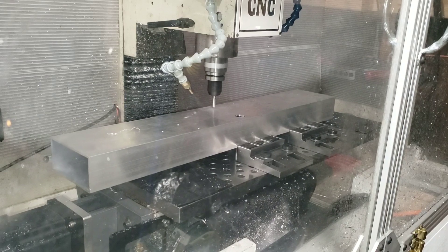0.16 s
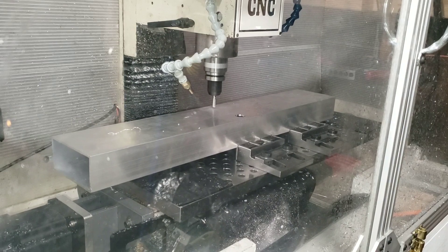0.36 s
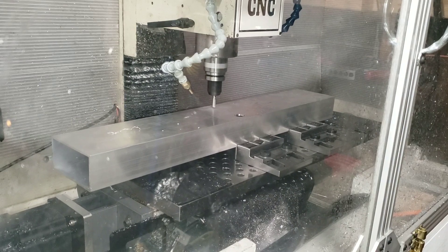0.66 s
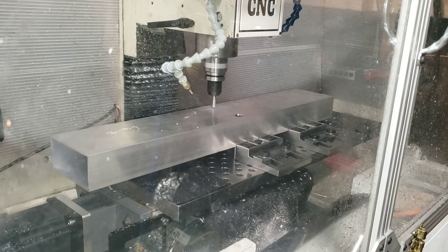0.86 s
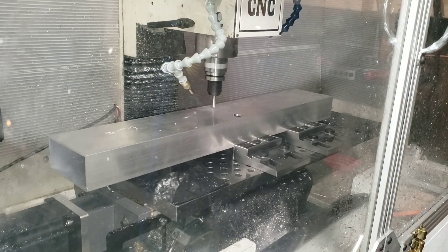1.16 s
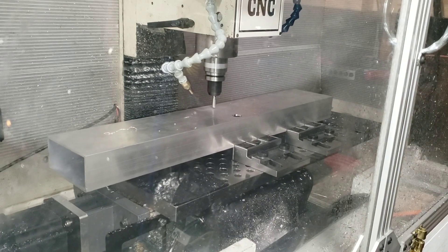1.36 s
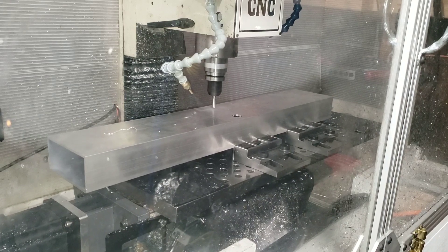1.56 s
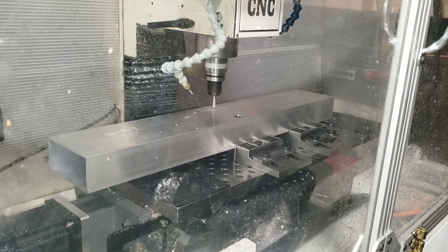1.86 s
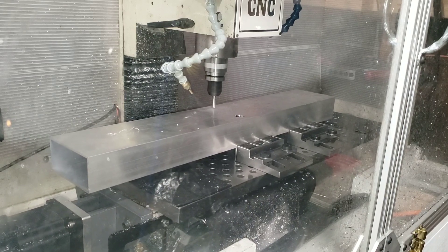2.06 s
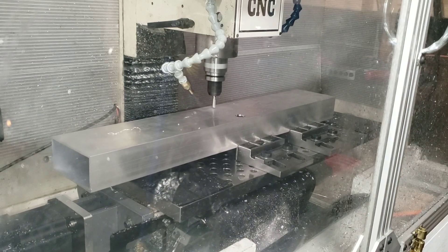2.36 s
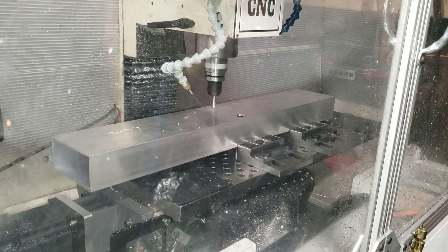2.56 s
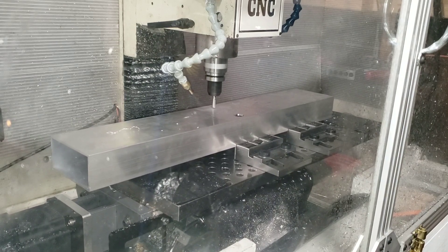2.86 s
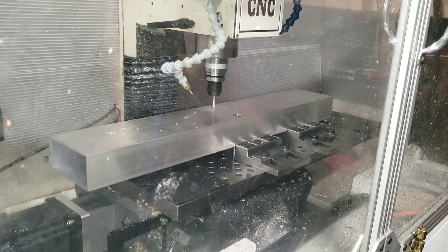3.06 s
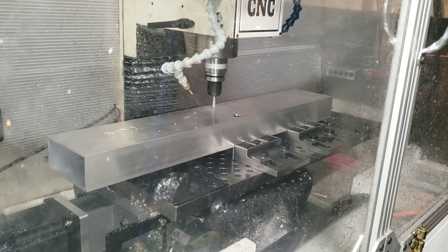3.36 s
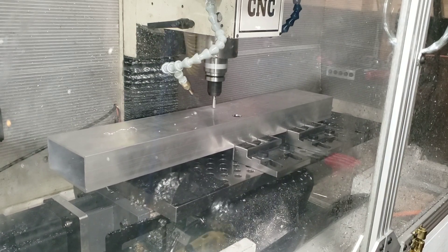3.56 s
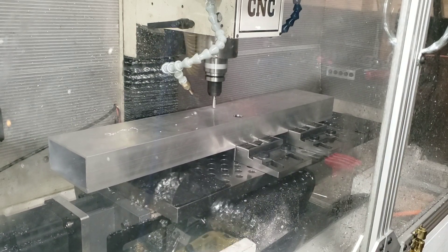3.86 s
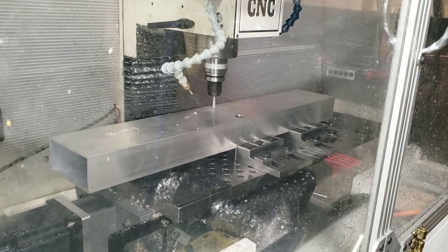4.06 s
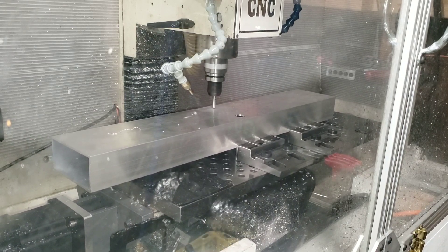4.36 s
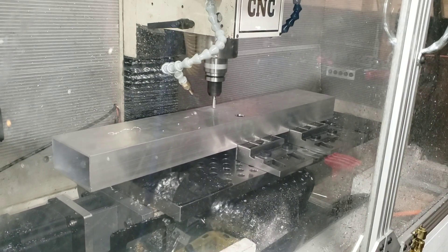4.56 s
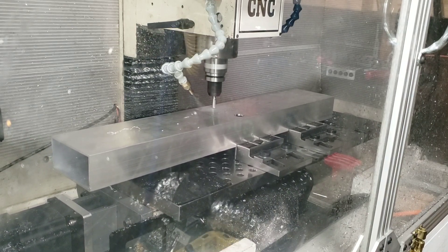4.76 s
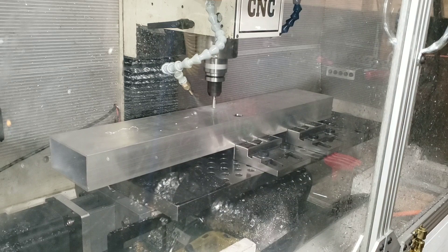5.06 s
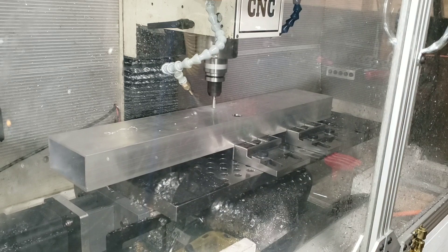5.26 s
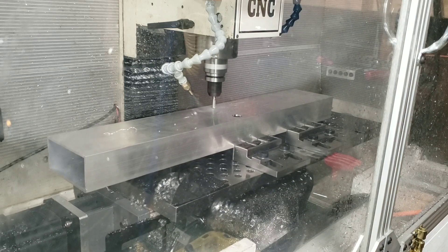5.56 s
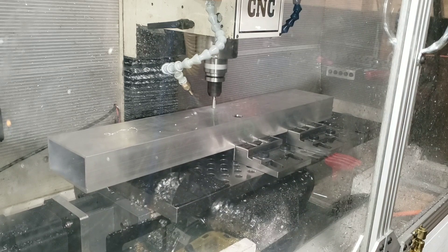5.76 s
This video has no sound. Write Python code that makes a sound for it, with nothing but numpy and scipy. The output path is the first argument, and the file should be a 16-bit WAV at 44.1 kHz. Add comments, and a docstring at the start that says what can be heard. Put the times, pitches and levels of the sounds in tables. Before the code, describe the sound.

A continuous close-up machining sound: broad, sizzling air-and-mist spray over low motor rumble and a steady hum. Table drive tones glide up and down beneath it, repeating with each two-second lap, without sharp cuts or impacts. Faint fan and spindle tones add a fine mechanical whine. The small metal enclosure gives a tight, hard ambience, heard in stereo with spread-out treble and a mostly central low end.

```python
"""Inside a sheet-metal enclosure a small mill cuts round a pocket in an aluminium tube, a lap in about two seconds.
A mist nozzle hisses as broad noise, built from bands of slightly varying level; motors and slides rumble lower.
The frame hums as a sine; spindle and fan sing as sines at multiples of shaft speed, among faint steady tones.
The feed drive's sine rises and falls through the frame resonances with the table speed. Two microphone ports
hear the bass alike and the hiss apart."""
import sys
import numpy as np
from scipy import signal
from scipy.fft import rfft, irfft
from scipy.io import wavfile
from scipy.ndimage import uniform_filter1d

SR = 44100
rng = np.random.default_rng(int(sys.argv[2]) if len(sys.argv) > 2 else 0)


def inscribe(sig):
    """Save sig as 16-bit PCM at rate SR to the path in sys.argv[1].

    A 1-D sig is mono; a 2-D sig holds one channel per row.
    Samples are clipped to [-1, 1] before scaling.
    """
    pcm = np.round(np.clip(np.atleast_2d(sig).T, -1, 1) * 32767)
    wavfile.write(sys.argv[1], SR, pcm.astype(np.int16))


N = 260631
T = np.arange(N) / SR  # time, s
F = np.fft.rfftfreq(N, 1 / SR)  # frequency of each bin, Hz
SIDES = np.array([[.5], [-.5]])  # left and right share of a difference between the ports
LAP_S = 2.032


def undb(db):
    """Amplitude ratio from decibels: twenty per factor of ten."""
    return 10 ** (np.asarray(db) / 20)


def curves(table):
    """Linear interpolation in time: each column of a time table as one value per sample."""
    s, *columns = np.transpose(table)
    return [np.interp(T, s, column) for column in columns]


def over_hz(table):
    """Interpolation on a logarithmic frequency axis: one value per bin."""
    hz, value = np.transpose(table)
    return np.interp(np.log(F + 1), np.log(hz), value)


def walk(rate):
    """Low-passed randomness: levels held 1 / rate s, smoothed by two moving averages; spread near 1."""
    hold = int(SR / rate)
    steps = np.repeat(rng.standard_normal(N // hold + 1), hold)
    return 1.52 * uniform_filter1d(uniform_filter1d(steps, hold), hold)[:N]


def wall_echoes(source):
    """Reverberation: a source spectrum reaches each port by its own exponentially decaying wall echoes."""
    t60_s = 0.16
    echoes = rng.standard_normal((2, N)) * undb(-60 * T / t60_s)
    return source * rfft(echoes) / np.sqrt(np.sum(echoes ** 2) / 2)


def noise(colour, vary_db, rate, echo_db, count=10):
    """Partly coherent noise in overlapping bands, each varying alone in level; the port average has rms 1."""
    # likeness of the two ports: (frequency [Hz], correlation [-1 to 1])
    likeness = [(25, .95), (60, .93), (110, .88), (220, .97), (300, .82), (550, .72), (640, .8), (760, .1),
                (850, -.2), (940, .5), (1200, -.05), (2000, .05), (7000, .05), (15000, -.2)]
    # balance of the ports: (frequency [Hz], left minus right [dB])
    balance = [(100, -2), (900, 1), (1000, 2.5), (1200, 0), (3500, 1.5), (5000, 0.8), (6800, 1.5),
               (8000, -2), (10000, -1), (12500, -3.5), (14300, -1.5), (15000, -3), (15700, -5)]
    # standing waves in the enclosure: (frequency [Hz], width [Hz], left boost [dB], right boost [dB])
    standing_waves = [(1700, 90, 2.1, 0.0), (1820, 90, 0.0, 2.5), (2756, 130, 1.8, 0.0),
                      (3531, 130, 0.0, 1.3), (11714, 130, 1.5, 0.0), (12489, 130, 0.0, 1.5),
                      (12919, 130, 0.0, 2.3), (13178, 130, 1.3, 0.0), (14211, 130, 0.0, 1.8),
                      (15417, 130, 0.0, 1.8)]
    alike = np.clip(over_hz(likeness), -1, 1)
    mid, side, source = rfft(rng.standard_normal((3, N)))
    pair = np.sqrt(1 + alike) * mid + 2 * SIDES * np.sqrt(1 - alike) * side
    pair = pair + undb(echo_db) * wall_echoes(source)
    waves_db = sum(np.array([[left_db], [right_db]]) / (1 + (2 * (F - hz) / width) ** 2)
                   for hz, width, left_db, right_db in standing_waves)
    pair = pair * undb(over_hz(colour) + SIDES * over_hz(balance) + waves_db)

    # raised-cosine bands, evenly spaced in log frequency across the colour table
    low, high = np.log(colour[0][0]), np.log(colour[-1][0])
    place = (np.log(F + 1) - low) / (high - low) * count
    out = 0
    for k in range(count + 1):
        window = np.cos(np.pi / 2 * np.clip(place - k, -1, 1)) ** 2
        out = out + undb(vary_db * walk(rate)) * irfft(pair * window, N)
    return out / np.sqrt(np.mean(out.mean(axis=0) ** 2))


def tone(turns, db, pan_db, lead):
    """Simple harmonic motion: a sine at both ports, its rms in dB, the left port leading by lead rad."""
    return np.sqrt(2) * undb(db + SIDES * pan_db) * np.sin(2 * np.pi * turns + SIDES * lead)


def orders(turns, multiples, table, waver_db, sway, rate):
    """Order spectrum: multiples of one rotation, wavering in level and swaying (rad) between the ports."""
    out = 0
    for k, (db, pan_db, lead) in zip(multiples, table):
        level_db = db + waver_db * walk(3.0)
        out = out + tone(k * turns + rng.random(), level_db, pan_db, lead + sway * walk(rate))
    return out


def feed_speed():
    """Sinusoidal motion: signed speed of the long axis, 1 at its fastest, out and back once a lap."""
    fastest_s = 0.712
    return np.cos(2 * np.pi * (T - fastest_s) / LAP_S)


def faint_tones():
    """Line spectrum: faint tones of steady pitch that fade together exponentially."""
    # frequency of each tone: (frequency [Hz])
    tones_hz = [299.7, 475.0, 553.6, 898.0, 1280.0, 2560.1, 2765.8]
    # the same tones, levels halfway through: (level [dB], left minus right [dB], left leads [rad])
    tone_levels = [(-62.5, 1, .3), (-61, 0, -.2), (-62, 7, 1), (-68, 0, 2.8), (-65, 0, 3), (-64, -6, 0),
                   (-65, 6, -.1)]
    fade_db_per_s = 1.1
    fade = undb(fade_db_per_s * (T[-1] / 2 - T))
    return fade * orders(T, tones_hz, tone_levels, 2, .2, 28)


def fan():
    """Rotational harmonics: the fan sounds at whole multiples of its constant shaft rate."""
    # multiples of the shaft rate that sound: (order [1])
    fan_multiples = [1, 6, 7, 8, 10, 11, 12, 13, 14, 15, 16, 17, 18, 23, 24, 25]
    # the same orders: (level [dB], left minus right [dB], left leads [rad])
    fan_levels = [(-54, -1, 0), (-62, 1, .2), (-68, 0, -.2), (-60.5, -1, .5), (-64, -5, .6),
                  (-69, -5, -1.7), (-70, 2, -.5), (-61, 4, -.2), (-61.5, 11, 1.1), (-68, 8, -.7),
                  (-63, 7, .6), (-64, -1, 1.9), (-71, -4, -.6), (-62, 0, 2.8), (-62, -2, .4),
                  (-61, 5, -2.8)]
    fan_hz = 73.145
    return orders(fan_hz * T, fan_multiples, fan_levels, 1.6, .3, 28)


def rumble():
    """Forced broadband vibration: motors and slides shake the frame, the low part following the feed speed."""
    # colour of the rumble: (frequency [Hz], relative spectral level [dB per Hz])
    rumble_colour = [(20, -22), (57, -7), (66, -2.5), (76, -3.5), (95, -1), (135, -2), (165, -3.5),
                     (200, -13.5), (262, -18), (290, -12.5), (500, -17.5), (620, -19), (680, -15.5),
                     (790, -15), (825, -15), (855, -24), (950, -17), (1120, -18.5), (1500, -17),
                     (1550, -24), (1800, -38)]
    # bands whose level varies quickly: (centre [Hz], width [Hz], depth [dB], changes per second [1/s])
    varying_bands = [(235, 95, 6, 13), (815, 120, 7, 18)]
    start_db, fade_db_per_s = -39, 0.25
    low_hz, rest_db = 288, -3.5  # below low_hz the rumble sinks while the long axis turns round
    whole = noise(rumble_colour, 0.8, 12, -21.0, count=15)
    for hz, width, depth_db, rate in varying_bands:
        band = irfft(rfft(whole) / (1 + (2 * (F - hz) / width) ** 6), N)
        gain = undb(depth_db * np.tanh(1.5 * walk(rate)))
        gain = gain / np.sqrt(np.mean(gain ** 2))
        whole = whole + (gain - 1) * band
    low = irfft(rfft(whole) / (1 + (F / low_hz) ** 8), N)
    low_db = rest_db * (1 - np.abs(feed_speed())) ** 2
    return undb(start_db - fade_db_per_s * T) * (whole - low + undb(low_db) * low)


def jet_body():
    """Jet impingement: broad noise where the mist strikes the work, its treble swelling once a lap."""
    # colour of the jet body: (frequency [Hz], relative spectral level [dB per Hz])
    body_colour = [(1400, -46), (1570, -4.5), (1700, -1), (2200, -2), (2800, -0.5), (4500, -1),
                   (6200, -0.2), (7300, 1.5), (7700, -2), (8200, -7), (8700, -9), (9500, -6)]
    start_db, rise_db_per_s = -36.5, 0.1238
    bright_hz, swing_db, brightest_s = 3660, 0.97, 0.15
    body = noise(body_colour, 1.19, 22.034, -0.16, count=20)
    dull = irfft(rfft(body) / (1 + (F / bright_hz) ** 4), N)
    bright_db = swing_db * np.cos(2 * np.pi * (T - brightest_s) / LAP_S)
    return undb(start_db + rise_db_per_s * T) * (dull + undb(bright_db) * (body - dull))


def nozzle_sizzle():
    """Turbulent jet noise: the air leaving the nozzle sizzles high up."""
    # colour of the sizzle: (frequency [Hz], relative spectral level [dB per Hz])
    sizzle_colour = [(8300, -41), (8800, -27.5), (10200, -13), (10900, -10), (11700, -5), (12900, -3.5),
                     (14000, -5), (14700, 0.5), (14900, -0.5), (15400, 2), (15750, 1)]
    # level of the sizzle: (time [s], level [dB])
    sizzle_level = [(0, -28.5), (1.1, -27.5), (4.6, -28.5), (5.0, -29), (5.5, -28), (5.91, -28)]
    level_db, = curves(sizzle_level)
    return undb(level_db) * noise(sizzle_colour, 0.54, 17, 2.8, count=10)


def frame_hum():
    """Forced vibration at one frequency: the frame's hum swells and sinks with each lap."""
    # hum through one lap: (time into the lap [s], level [dB])
    hum_level = [(0, -29), (.22, -29.5), (.6, -26.5), (.76, -29.5), (.86, -31.5), (1.15, -32.5),
                 (1.26, -36.5), (1.34, -32), (1.46, -32.5), (1.55, -31), (1.8, -29)]
    hum_hz = 110.2
    pan_db, pan_per_db = 3.5, -0.2  # left minus right at the lap's start, and its change per dB of hum
    s, level_db = np.transpose(hum_level)
    hum_db = np.interp(T, s, level_db, period=LAP_S)
    balance_db = pan_db + pan_per_db * (hum_db - hum_db[0]) + 1.2 * walk(7.9)
    return tone(hum_hz * T, hum_db, balance_db, -0.16)


def feed_drive():
    """Resonant transmission: the long axis's tone follows table speed and the frame weights it by frequency."""
    # how the frame passes the tone: (frequency [Hz], gain [dB])
    frame_response = [(40, -28), (90, -14), (125, 0), (142, -12), (160, 1.5), (172, -7.5), (182, -21),
                      (200, -21)]
    top_hz = 193.5
    out_db, back_db = -35.5, -42  # before the frame's gain
    speed = feed_speed()
    hz = top_hz * np.abs(speed)
    db = np.where(speed > 0, out_db, back_db) + np.interp(hz, *np.transpose(frame_response))
    return tone(np.cumsum(hz) / SR + rng.random(), db + 1.5 * walk(4), 1.5, 0)


def cross_axis():
    """Passage through resonance: each lap the cross axis glides past a frame resonance in a brief swell."""
    centre_s, spread_s = 0.11, 0.041  # time into the lap, and standard deviation of the swell
    centre_hz, glide_hz_per_s, peak_db = 155, 200, -42
    u = (T - centre_s + LAP_S / 2) % LAP_S - LAP_S / 2  # time from the nearest swell, s
    turns = centre_hz * T + glide_hz_per_s * u ** 2 / 2
    return np.exp(-.5 * (u / spread_s) ** 2) * tone(turns, peak_db, 0, 0)


def spindle():
    """Phase-locked harmonics: shaft orders and motor-slot whine share one speed, which sags under load."""
    # slot whine: (time [s], pitch [Hz], level [dB])
    slot_whine = [(0, 7335, -50), (.6, 7330.5, -49), (1, 7321, -48.5), (1.5, 7320, -50), (1.9, 7331.5, -54),
                  (3, 7329.5, -47), (3.6, 7330, -45), (3.9, 7335, -48), (4.7, 7335.5, -49),
                  (5.1, 7335, -55), (5.91, 7333, -47)]
    # multiples of the shaft rate that sound: (order [1])
    spindle_multiples = [2, 6, 10, 12, 18, 35, 40]
    # the same orders: (level [dB], left minus right [dB], left leads [rad])
    spindle_levels = [(-58, 1, -.2), (-49.5, 0, 0), (-61.5, -1, -.3), (-52, 0, -3.05), (-66, 2, .6),
                      (-62, -4, 1.3), (-63, 0, 2.8)]
    slots, whine_lead = 110, 2.7  # whine cycles per turn; left leads, rad
    fifth_db, fifth_pan_db, fifth_lead = -56.5, -4, 0.22  # fifth order: dB, dB, rad
    dip_s, dip_spread_s, dip_db = 0.69, 0.07, 12  # its dip once a lap: time into the lap, spread, depth
    hz, whine_db = curves(slot_whine)
    turns = np.cumsum(hz / slots) / SR
    dip = dip_db * np.exp(-.5 * ((T % LAP_S - dip_s) / dip_spread_s) ** 2)
    fifth = tone(5 * turns, fifth_db - dip + 2 * walk(7), fifth_pan_db, fifth_lead)
    whine = tone(slots * turns, whine_db + 1.5 * walk(9), 0, whine_lead)
    return orders(turns, spindle_multiples, spindle_levels, .4, .6, 15) + fifth + whine


def scene():
    """Linear superposition: the pressures of all sources add at the two ports."""
    background = faint_tones() + fan() + rumble()
    mist = jet_body() + nozzle_sizzle()
    frame = frame_hum() + feed_drive() + cross_axis()
    return background + mist + frame + spindle()


def record(dry):
    """Band limitation: an elliptic low-pass cuts the top steeply."""
    top_hz = 15745
    return signal.sosfilt(signal.ellip(14, .3, 75, top_hz, fs=SR, output="sos"), dry)


dry = scene()
out = record(dry)
inscribe(out)
```